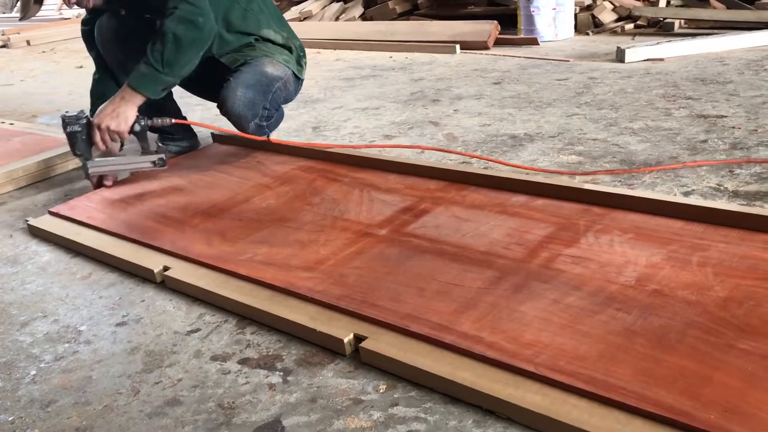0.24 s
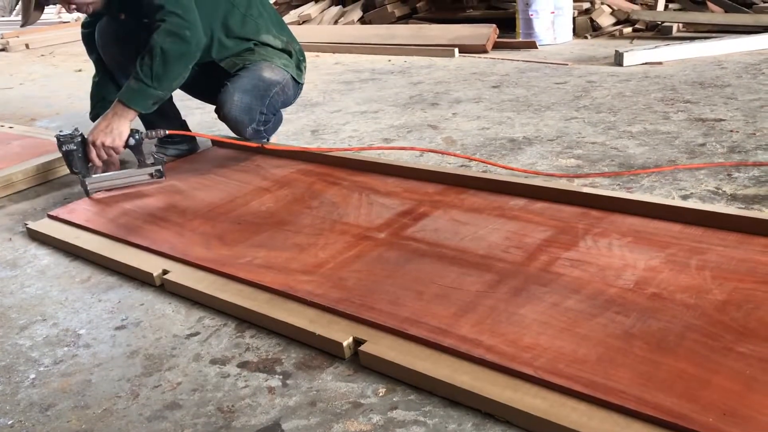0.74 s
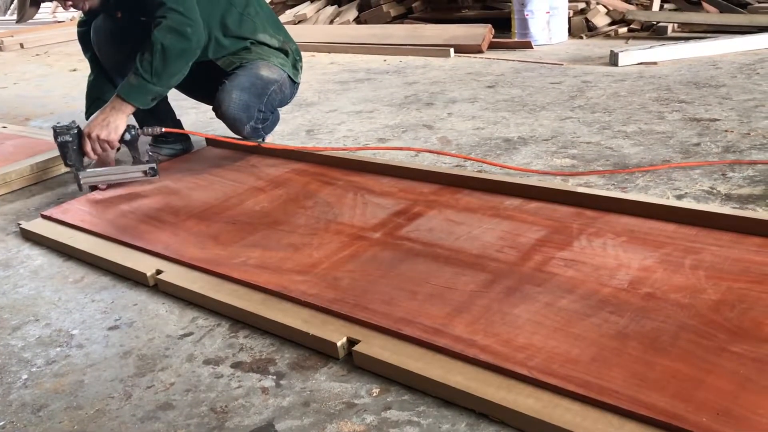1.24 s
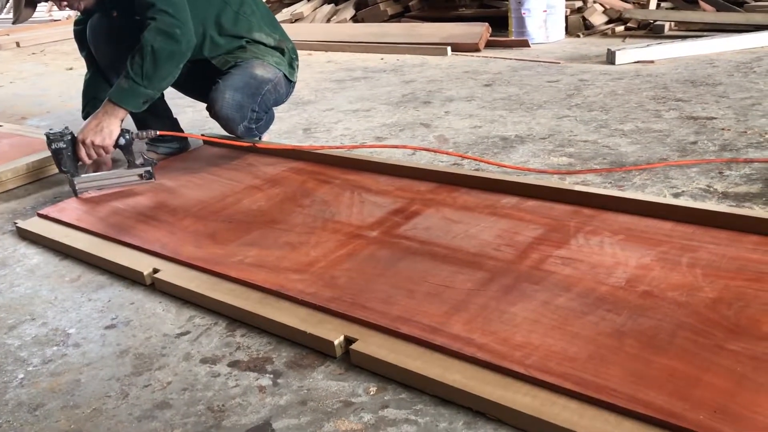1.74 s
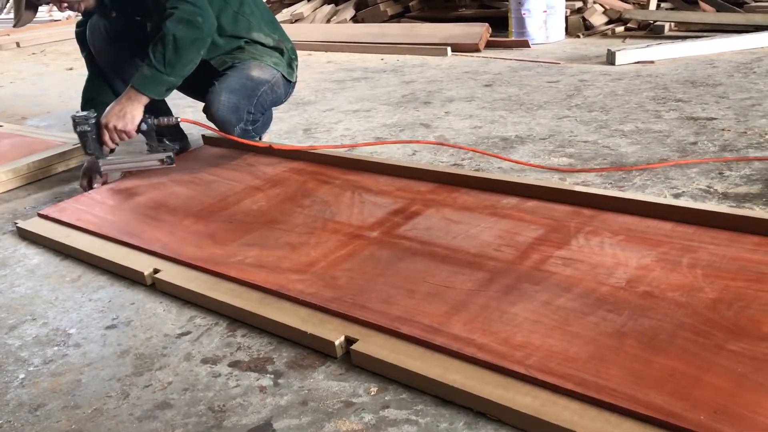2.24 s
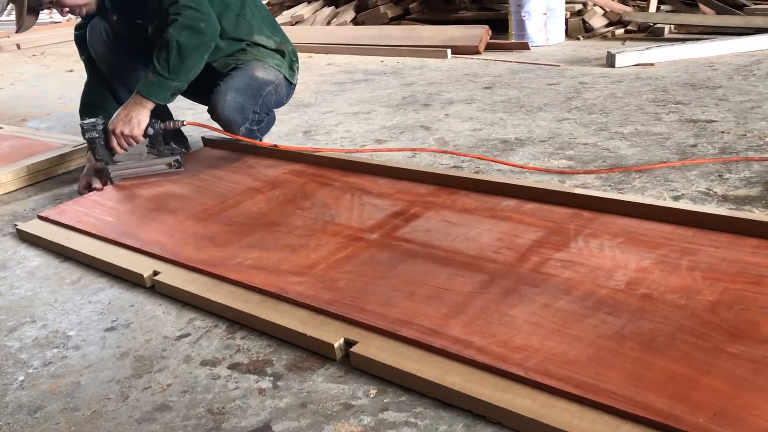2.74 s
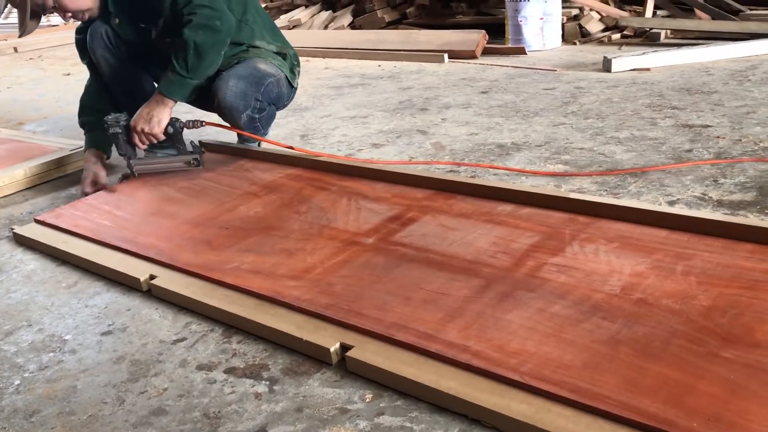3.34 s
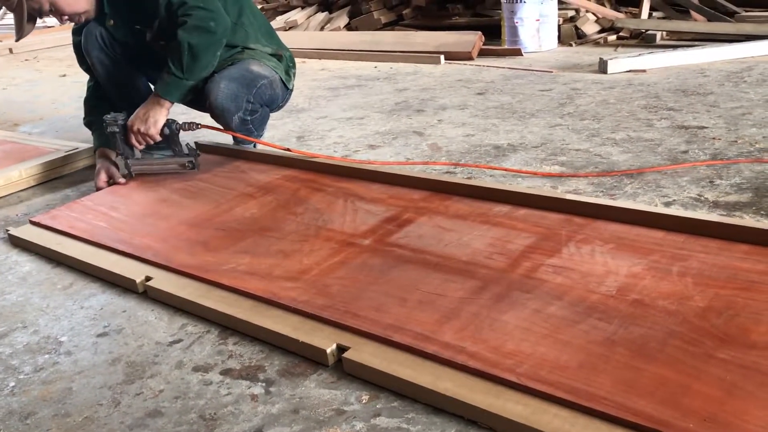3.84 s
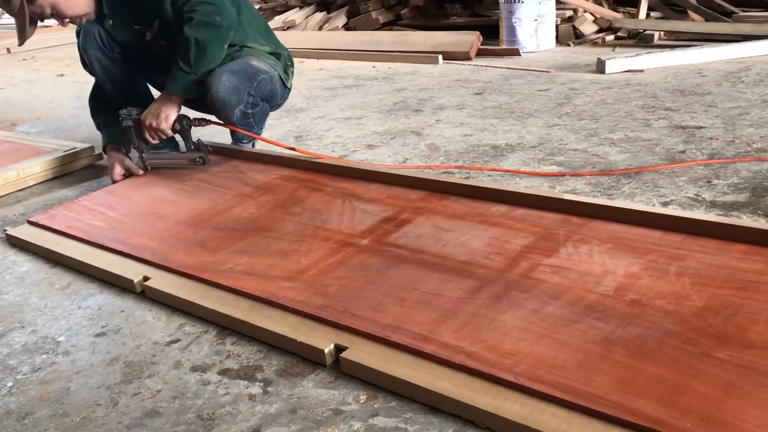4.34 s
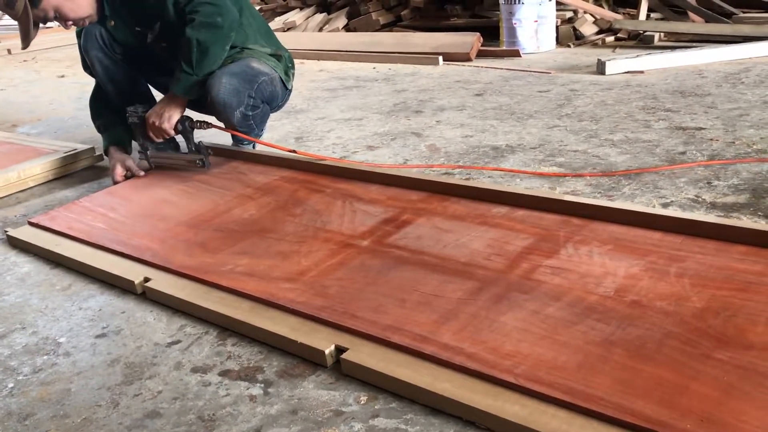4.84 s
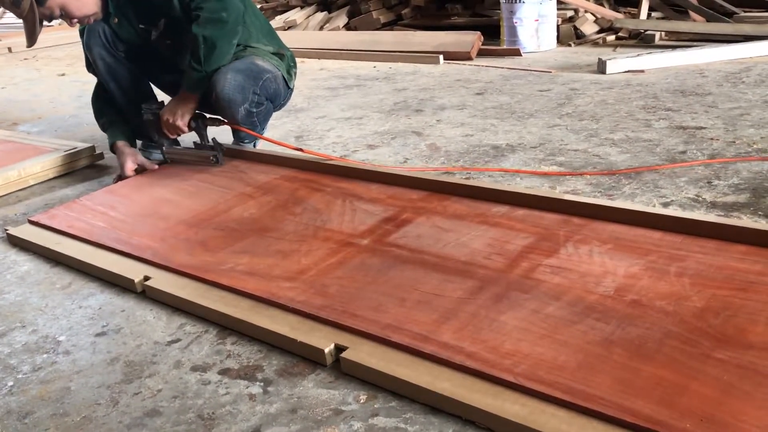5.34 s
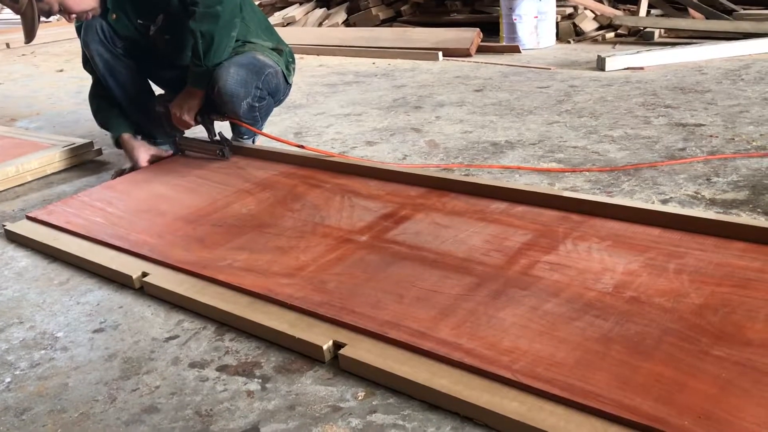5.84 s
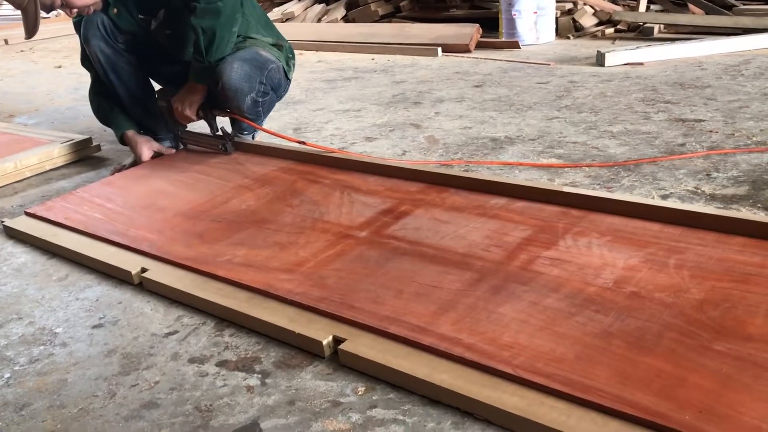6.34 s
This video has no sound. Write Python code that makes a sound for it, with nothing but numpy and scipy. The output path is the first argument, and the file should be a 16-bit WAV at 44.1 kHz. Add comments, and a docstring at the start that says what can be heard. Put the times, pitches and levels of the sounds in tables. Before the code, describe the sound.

A pneumatic nail gun works on a thin wood panel close to the microphone in a wide, open workshop. It fires seven times, at about 0.4, 1.8, 2.5, 3.6, 4.4, 5.3 and 6.2 seconds. Each shot begins with a tiny rush of air, then a sharp, slightly metallic crack and a short hollow boom from the panel. A tenth to a fifth of a second later comes a hissing puff of exhaust with a small clack. The gun's nose taps softly on the wood between shots, around 0.1, 1.2, 1.5, 3.4 and 4.1 seconds, and more faintly at 5 and 6. Each shot echoes for about a second. Far off, a low rumble and a slow engine continue quietly, swelling around 1 second and then easing. One faint, thin, distant squeal fades out within the first second.

```python
"""Nail gun in an open workshop

Close to one microphone, a pneumatic gun drives seven nails through a thin wood panel into its frame.
Each shot: air rushes in, the driver cracks down, the panel booms, the exhaust puffs, the piston knocks.
Between shots the nose is set down on the wood. Far off are a rumble, a slow engine and one faint squeal.
The wide room echoes the work, and the recorder's limiter flattens the cracks."""
import sys
import numpy as np
from scipy import signal
from scipy.fft import rfft, irfft
from scipy.io import wavfile
from scipy.ndimage import uniform_filter1d, minimum_filter1d

SR = 44100
rng = np.random.default_rng(int(sys.argv[2]) if len(sys.argv) > 2 else 0)


def materialize(psi):
    """Save the field psi as 16-bit PCM at rate SR to the path in sys.argv[1].

    A 1-D psi becomes a single channel; in a 2-D psi each row is a channel.
    """
    bounded = np.clip(np.atleast_2d(psi).T, -1, 1)
    quanta = np.round(bounded * 32767).astype(np.int16)
    wavfile.write(sys.argv[1], SR, quanta)


N = 291060
TIME = np.arange(N) / SR
AGE = np.arange(SR // 2) / SR  # seconds since an event began

# the rumble from outdoors: freq_hz, level_db
RUMBLE_SPECTRUM = [(20, -39.5), (45, -5), (90, 0), (130, -8.5), (190, -2), (320, -4.5), (500, -16),
                   (800, -25), (1300, -19.5), (2200, -25.5), (4000, -30.5), (7000, -43), (15000, -43.5)]
# the far engine works, then eases off: time_s, firing_hz, level_db
ENGINE_RUN = [(0, 17.6, -47.5), (.55, 18.3, -45), (1.0, 20.8, -36), (1.799, 18.5, -41.5),
              (2.398, 19.25, -40.5), (4.401, 15.7, -48.5), (6.6, 18.8, -46)]
# harmonics of its firing rate: multiple, level_db
ENGINE_HARMONICS = [(4, -11), (5, -3), (6, -1), (7, 0), (8, -7), (11, -21), (13, -19), (14, -18), (17, -16),
                    (18, -16)]
# the panel's strong modes: pitch_hz, level_db, t60_s
PANEL_RESONANCES = [(158.95, -4, 0.74), (193, 2.5, 0.12), (191, 3.5, 0.1), (231.6, -1, 0.26),
                    (274.8, -6.5, 0.25), (282.1, -6.5, 0.7), (357, -10.5, 0.37), (464.8, -5, 0.17),
                    (537, -1, 0.14), (598, -12, 0.22), (645, -6, 0.11), (818, -9.5, 0.14)]
# its many weak modes, the grain: freq_hz, level_db
GRAIN_SPECTRUM = [(40, -32.5), (120, -39.5), (165, 11), (280, -1), (390, -5.5), (520, -4.5), (720, -8),
                  (1500, -11.5), (3000, -34.5), (6000, -53)]
# how the grain dies away: freq_hz, t60_s
GRAIN_DECAY = [(150, 0.39), (500, 0.22), (1500, 0.21), (5000, 0.052)]
# the nose is set down on the panel: start_s, boom_db, tick_db, rebound_db
NOSE_TAPS = [(0.0758, -29, -34.5, -14.5), (1.189, -26, -25.5, -19), (1.452, -28.5, -35, -20.5),
             (3.390, -27.5, -38.5, -9.5), (4.073, -24.5, -26, -6.5), (5.0237, -39, -45.5, -15.5),
             (6.016, -43, -52, -17)]
# a hard contact: freq_hz, level_db
CRACK_SPECTRUM = [(30, -40), (80, -16), (400, -5), (800, -4.5), (1500, 7), (2000, 0.5), (3200, 2.5),
                  (4300, -1.5), (5500, -9), (7500, -18), (15000, -21.5)]
# a dull contact: freq_hz, level_db
TICK_SPECTRUM = [(200, -0.5), (700, -2), (1400, -9), (2400, -4.5), (3800, -17.5), (5000, -34.5),
                 (15000, -51.5)]
# the trigger is pulled and the valve opens after a short leak: open_s, leak_s
TRIGGER_PULLS = [(.4266, 0.0017), (1.75, .017), (2.514, .007), (3.574, 0.0098), (4.389, 0.0088),
                 (5.320, .001), (6.151, .002)]
# air hissing through the valve: freq_hz, level_db
VALVE_SPECTRUM = [(40, -26), (120, -7.5), (480, -27), (950, -11.5), (1600, -12.5), (1900, -18.5),
                  (3500, -8), (5000, -9), (7000, -6.5), (10500, -8), (14500, 0.5), (16500, -3)]
# the driver hits a nail: start_s, crack_db, boom_db, body_db, tilt_db_per_octave, bite_hz
NAIL_SHOTS = [(0.4463, -1, -15, -10, 0, 3250), (1.7879, -5, -15.5, -11.5, 9.5, 3650),
              (2.5386, -4.5, -17.5, -16.5, 3, 2350), (3.600, -3, -14, -6.5, -2, 3400),
              (4.4145, -4, -16.5, -5.5, -3.5, 3460), (5.3455, -5.5, -18.5, -12.5, 1, 3200),
              (6.177, -3, -17, -13.5, 2.5, 3305)]
# the gun body's modes: pitch_hz, level_db, t60_s
BODY_RESONANCES = [(1060, -6, .025), (1355, -2, .028), (1440, -4, .025), (1620, 1, .03), (1990, -5, .022),
                   (2290, -5, .022), (2570, -4, .022), (2885, -4, .022), (3090, -1, .025), (3690, -4, .022),
                   (3800, -5, .022)]
# the trigger is let go and the cylinder vents: start_s, level_db
TRIGGER_RELEASES = [(.5863, -7.5), (1.8791, -9.5), (2.6555, -10.5), (3.711, -10), (4.558, -10),
                    (5.5213, -10), (6.329, -10)]
# the exhaust jet: freq_hz, level_db
EXHAUST_SPECTRUM = [(30, -21), (90, 3.5), (280, 1), (550, -11), (900, -4.5), (2000, -8), (4000, -8),
                    (7500, -8.5), (10000, -5.5), (12000, -4.5), (14500, 1), (16500, -1.5)]
# the piston stop's modes: pitch_hz, level_db, t60_s
STOP_RESONANCES = [(170, -12, 0.02), (892, -5, 0.015), (1076, 1.5, 0.023), (1220, -12.5, 0.0075),
                   (1630, -2.5, 0.014), (2370, -9.5, 0.017), (3400, -3, 0.018)]
# the colour of the workshop's echoes: freq_hz, level_db
ROOM_SPECTRUM = [(50, 2.5), (160, 0), (400, -5), (750, -6), (1150, 1), (1800, 2.5), (3200, -5), (6000, 0),
                 (9000, -3.5), (15000, -4.5)]
# how the echoes die away: freq_hz, t60_s
ROOM_DECAY = [(100, 1.3), (500, 1.36), (1400, 1.06), (3000, 1.086), (6000, 0.88), (10000, 0.71),
              (15000, .43)]


def undb(db):
    """Decibels to gain."""
    return 10 ** (np.asarray(db) / 20)


def unit(x):
    """Scale to rms 1."""
    return x / np.sqrt(np.mean(x ** 2))


def at_hz(points, hz):
    """Read (freq_hz, value) points on a log-frequency axis."""
    freq_hz, value = np.transpose(points)
    return np.interp(np.log(np.maximum(hz, 1)), np.log(freq_hz), value)


def noise(spectrum, size=len(AGE)):
    """Coloured noise, rms 1."""
    gain = undb(at_hz(spectrum, np.fft.rfftfreq(size, 1 / SR)))
    return unit(irfft(rfft(rng.standard_normal(size)) * gain, size))


def fade(t, t60_s):
    """Full level until t = 0, then an exponential decay."""
    return np.exp(-np.log(1000) * np.maximum(t, 0) / t60_s)


def envelope(rise_s, hold_s, t60_s):
    """A linear rise, and a decay that begins hold_s after the start."""
    return np.minimum(AGE / rise_s, 1) * fade(AGE - hold_s, t60_s)


def dense_ring(spectrum, decays, size=len(AGE), bands=14):
    """Countless overlapping modes: noise whose bands each die at their own rate."""
    source, t = rfft(noise(spectrum, size)), np.arange(size) / SR
    centres, hz = np.geomspace(60, 16000, bands), np.fft.rfftfreq(size, 1 / SR)
    out = np.zeros(size)
    for centre_hz, weights in zip(centres, np.eye(bands)):
        band = irfft(source * at_hz(np.c_[centres, weights], hz), size)
        out += band * fade(t, at_hz(decays, centre_hz))
    return out


def ring(modes, scatter_db, detune):
    """Struck modes, starting near rms 1; each blow lands elsewhere and weights them anew."""
    hz, db, t60_s = np.transpose(modes)
    strength, shift, start_turns = rng.standard_normal((len(hz), 3)).T
    gain = undb(db + scatter_db * strength)
    turns = np.outer(AGE, hz * (1 + detune * shift)) + start_turns
    waves = np.sin(2 * np.pi * turns) * fade(AGE[:, None], t60_s)
    return waves @ gain / np.sqrt(np.sum(gain ** 2) / 2)


def bend(x, lag_s, fast_hz=4000):
    """Bending waves cross the panel at a speed that grows with the root of pitch, so lows come late."""
    size = 2 * len(x)
    hz = np.fft.rfftfreq(size, 1 / SR)
    delay_s = lag_s * (np.sqrt(fast_hz / np.clip(hz, 100, fast_hz)) - 1)
    phase = 2 * np.pi * np.cumsum(delay_s) * SR / size
    return irfft(rfft(x, size) * np.exp(-1j * phase))[:len(x)]


def wander(rate_hz):
    """A smooth random drift, rms 1."""
    step = int(SR / rate_hz)
    stairs = np.repeat(rng.standard_normal(N // step + 1), step)
    return unit(uniform_filter1d(stairs, step)[:N])


def add(track, start_s, sound):
    """Mix a sound in at start_s."""
    i = int(start_s * SR)
    track[i:i + len(sound)] += sound[:N - i]


def outdoor_rumble(level_db=-44.5, fade_db_per_s=2.9, swell_share=0.58):
    """Rumble from outside shares part of the engine's swell and slowly dies down."""
    time_s, _, engine_db = np.transpose(ENGINE_RUN)
    swell_db = swell_share * np.interp(TIME, time_s, engine_db - engine_db.mean())
    trend_db = level_db - fade_db_per_s * TIME + swell_db
    return noise(RUMBLE_SPECTRUM, size=N) * undb(trend_db + 0.66 * wander(4.2))


def far_engine():
    """Only low harmonics of a slow engine's firings carry this far, wavering in level and phase."""
    time_s, firing_hz, level_db = np.transpose(ENGINE_RUN)
    firings = np.cumsum(np.interp(TIME, time_s, firing_hz)) / SR
    throb = np.zeros(N)
    for multiple, harmonic_db in ENGINE_HARMONICS:
        waver, drift_turns = undb(2 * wander(2)), .12 * wander(1)
        throb += undb(harmonic_db) * waver * np.cos(2 * np.pi * (multiple * firings + drift_turns))
    return unit(throb) * undb(np.interp(TIME, time_s, level_db))


def panel_boom(modes_db=0, grain_db=0, tilt_db_per_octave=0, grain_tilt_share=.4):
    """The thin panel rings in a few strong modes and many weak ones; the spot struck tilts them."""
    hz, db, t60_s = np.transpose(PANEL_RESONANCES)
    tilted_db = db + tilt_db_per_octave * np.log2(hz / hz[0])
    modes = ring(np.c_[hz, tilted_db, t60_s], scatter_db=0.5, detune=0.0025)
    band_hz, band_db = np.transpose(GRAIN_SPECTRUM)
    octaves = np.log2(np.clip(band_hz, hz[0], hz[-1]) / hz[0])
    grain_spectrum = np.c_[band_hz, band_db + grain_tilt_share * tilt_db_per_octave * octaves]
    grain = dense_ring(grain_spectrum, GRAIN_DECAY)
    flex = np.sin(np.pi / 2 * np.minimum(AGE / .002, 1)) ** 2
    return bend(flex * (undb(modes_db) * modes + undb(grain_db) * grain), lag_s=0.002593)


def nose_taps(rebound_s=.024):
    """The nose meets the wood with a short click, a dull tick and a soft boom, and rebounds once."""
    out = np.zeros(N)
    for start_s, boom_db, tick_db, rebound_db in NOSE_TAPS:
        click = noise(CRACK_SPECTRUM) * envelope(rise_s=0.00022, hold_s=0.00093, t60_s=0.009)
        tick = noise(TICK_SPECTRUM) * envelope(rise_s=0.00022, hold_s=.002, t60_s=0.017)
        contact = undb(-18) * click + bend(tick, lag_s=0.00205)
        knock = undb(tick_db) * contact + undb(boom_db) * panel_boom()
        add(out, start_s, knock)
        add(out, start_s + rebound_s, undb(rebound_db) * knock)
    return out


def far_squeal(start_s=0.13, pitch_hz=1555, sag_hz_per_s=70, level_db=-45):
    """A thin squeal in the distance swells, flutters, sags and fades, with a weak overtone."""
    out = np.zeros(N)
    hz = (pitch_hz - sag_hz_per_s * AGE) * (1 + .016 * wander(280)[:len(AGE)])
    phase = 2 * np.pi * np.cumsum(hz) / SR
    flutter = undb(2.5 * wander(60)[:len(AGE)])
    tone = np.sin(phase) + undb(-20.5) * np.sin(2 * phase)
    add(out, start_s, undb(level_db) * tone * flutter * envelope(rise_s=0.049, hold_s=0.19, t60_s=0.9))
    return out


def air_inrush(quick_fill_s=0.017, quick_flow_s=0.0089, leak_db=-30.5, rush_db=-16.5):
    """The valve leaks, then air rushes into the cylinder; a slower fill hisses for longer."""
    out = np.zeros(N)
    for (open_s, leak_s), (blow_s, *_) in zip(TRIGGER_PULLS, NAIL_SHOTS):
        leak = noise(VALVE_SPECTRUM) * envelope(rise_s=0.018, hold_s=leak_s, t60_s=0.018)
        add(out, open_s - leak_s, undb(leak_db) * leak)
        flow_s = quick_flow_s + 3.4 * max(blow_s - open_s - quick_fill_s, 0)
        rush = noise(VALVE_SPECTRUM) * envelope(rise_s=.003, hold_s=flow_s, t60_s=.025)
        easing = fade(AGE - flow_s / 3, t60_s=.1)  # the flow eases as the pressure builds
        add(out, open_s, undb(rush_db) * rush * easing)
    return out


def driver_blows(bumper_s=.011):
    """Steel snaps on steel and the nail grinds into the wood; the panel booms and the gun body rings."""
    out = np.zeros(N)
    for start_s, crack_db, boom_db, body_db, tilt, bite_hz in NAIL_SHOTS:
        snap = rng.standard_normal(len(AGE)) * envelope(rise_s=.0002, hold_s=0.00035, t60_s=0.0041)
        bite_band = [(bite_hz / 2, -25), (bite_hz, 0), (bite_hz * 2, -35)]
        bite = noise(bite_band) * envelope(rise_s=0.0016, hold_s=0.0014, t60_s=0.034)
        grind = noise(CRACK_SPECTRUM) * envelope(rise_s=0.00063, hold_s=0.012, t60_s=0.061)
        crack = undb(-15) * snap + undb(-2) * bite + undb(-8) * grind
        boom = panel_boom(modes_db=-2, grain_db=-3, tilt_db_per_octave=tilt)
        add(out, start_s, undb(crack_db) * crack + undb(boom_db) * boom)
        # the body is struck twice: as the driver meets the nail and as the piston lands on its bumper
        for late_s in (0, bumper_s):
            body = ring(BODY_RESONANCES, scatter_db=0.5, detune=0.0045) * np.minimum(AGE / 0.0023, 1)
            add(out, start_s + late_s, undb(body_db) * body)
    return out


def exhaust_puffs(leak_s=0.032, leak_db=-29.5):
    """The valve leaks as the trigger eases off, then the cylinder vents in one burst."""
    out = np.zeros(N)
    for start_s, level_db in TRIGGER_RELEASES:
        leak = noise(VALVE_SPECTRUM) * envelope(rise_s=0.013, hold_s=leak_s, t60_s=0.018)
        add(out, start_s - leak_s, undb(leak_db) * leak)
        burst = envelope(rise_s=0.0005, hold_s=0.02, t60_s=0.021) * fade(AGE, t60_s=0.16)
        add(out, start_s, undb(level_db) * noise(EXHAUST_SPECTRUM) * burst)
    return out


def piston_returns(travel_s=.0163, level_db=-10.5):
    """As the cylinder vents, the piston flies back up and clacks on its stop."""
    out = np.zeros(N)
    for vent_s, _ in TRIGGER_RELEASES:
        stop = ring(STOP_RESONANCES, scatter_db=0, detune=0.009)
        knock = stop * envelope(rise_s=0.0014, hold_s=0.013, t60_s=.04)
        clack = noise(TICK_SPECTRUM) * envelope(rise_s=0.0042, hold_s=0.0018, t60_s=0.0088)
        add(out, vent_s + travel_s, undb(level_db) * (knock + undb(-8) * clack))
    return out


def air_slip(start_s=1.616, level_db=-40.5):
    """A half-pulled trigger lets a little air slip, once."""
    out = np.zeros(N)
    hiss = noise(VALVE_SPECTRUM) * envelope(rise_s=0.0044, hold_s=.031, t60_s=.025)
    add(out, start_s, undb(level_db) * hiss)
    return out


def workshop_echoes(x, wet_db, build_up_s, swerve_hz, paths=4):
    """Echoes build up in the wide room and the treble dies first."""
    # the source swerves between paths to the walls, so no steady colour settles in the tail
    shares = np.array([wander(swerve_hz) for _ in range(paths)])
    shares /= np.linalg.norm(shares, axis=0)
    onset = np.minimum(np.arange(2 * SR) / SR / build_up_s, 1)
    out = np.zeros(N)
    for share in shares:
        response = dense_ring(ROOM_SPECTRUM, ROOM_DECAY, size=2 * SR) * onset
        out += signal.fftconvolve(x * share, response / np.linalg.norm(response))[:N]
    return undb(wet_db) * out


def far_wall(x, delay_s=0.073, level_db=-25):
    """One distinct slap comes back to the microphone from the far wall."""
    out = np.zeros(N)
    add(out, delay_s, undb(level_db) * x)
    return out


def limiter(x, ceiling, window=150):
    """The gain dips smoothly around every peak above the ceiling."""
    gain = ceiling / np.maximum(np.abs(x), ceiling)
    return x * uniform_filter1d(minimum_filter1d(gain, window), window)


def scene():
    """At the microphone, in mono: gun and panel close by, the room around them, the background far off."""
    knocks = driver_blows() + piston_returns() + nose_taps()
    jets = air_inrush() + exhaust_puffs() + air_slip()
    work = knocks + jets
    # turbulent jets change direction faster than the knocks
    echoes = workshop_echoes(knocks, wet_db=-17, build_up_s=0.018, swerve_hz=80)
    echoes += workshop_echoes(jets, wet_db=-12.5, build_up_s=0.011, swerve_hz=250)
    background = far_engine() + far_squeal() + outdoor_rumble()
    return (work + echoes + far_wall(work) + background)[None]


def record(dry):
    """The recorder drops the deepest bass, limits the cracks and cuts the top."""
    low_cut = signal.butter(2, 42, "highpass", fs=SR, output="sos")
    high_cut = signal.ellip(10, .2, 70, 15900, fs=SR, output="sos")
    limited = limiter(signal.sosfilt(low_cut, dry), ceiling=0.71)
    return signal.sosfilt(high_cut, limited)


dry = scene()
out = record(dry)
materialize(out)
```